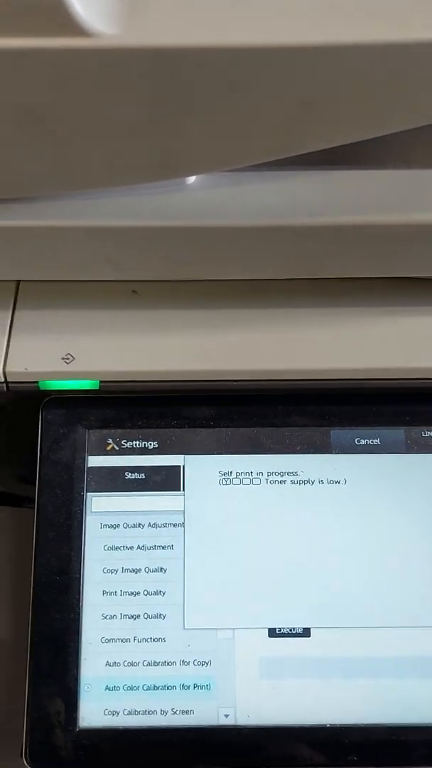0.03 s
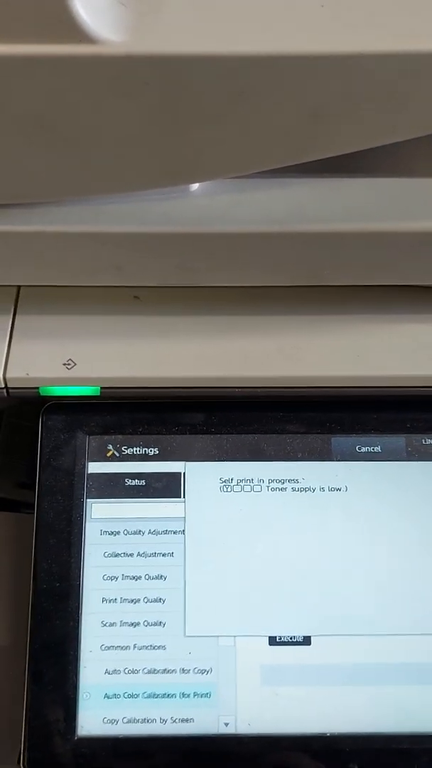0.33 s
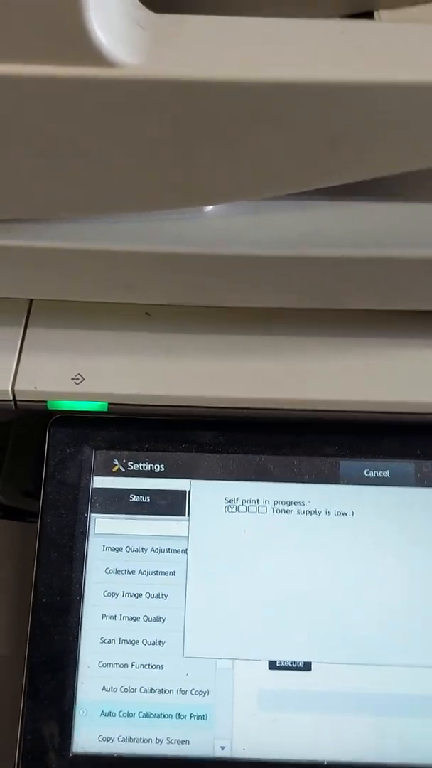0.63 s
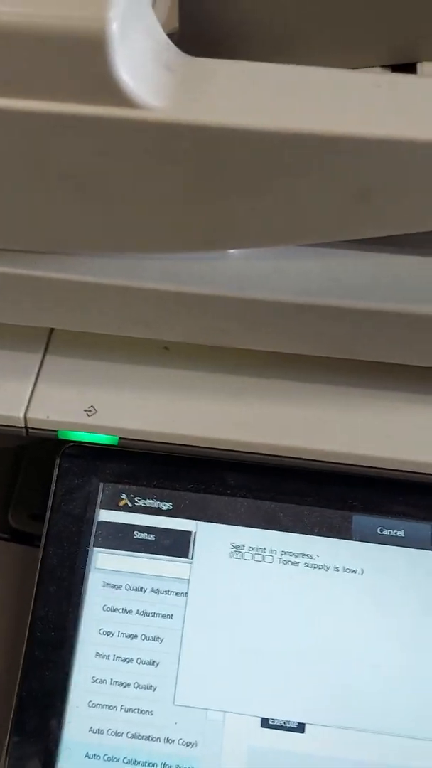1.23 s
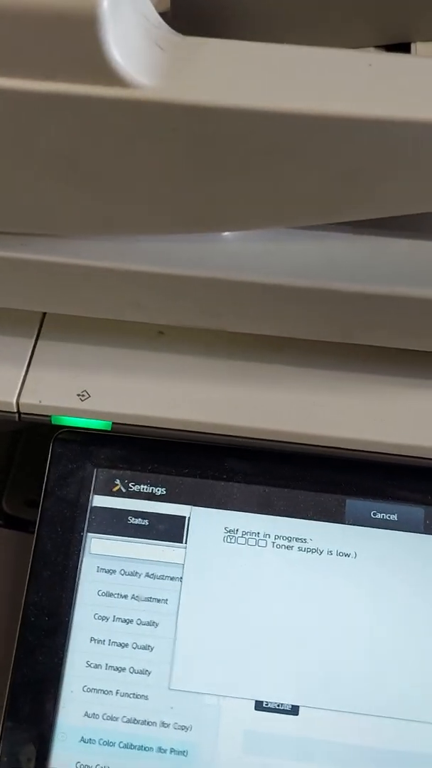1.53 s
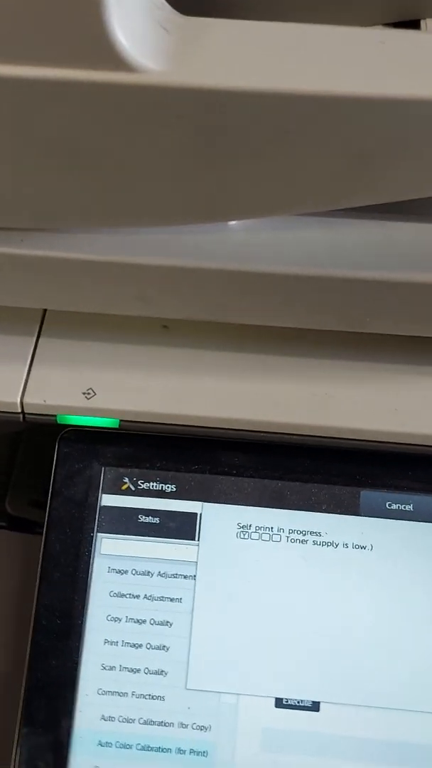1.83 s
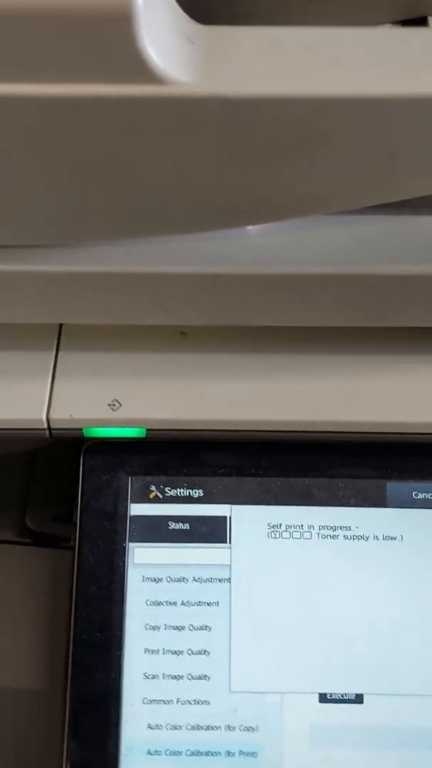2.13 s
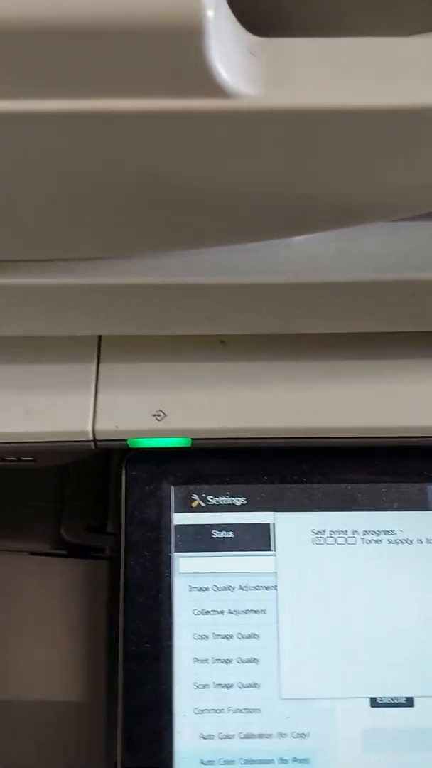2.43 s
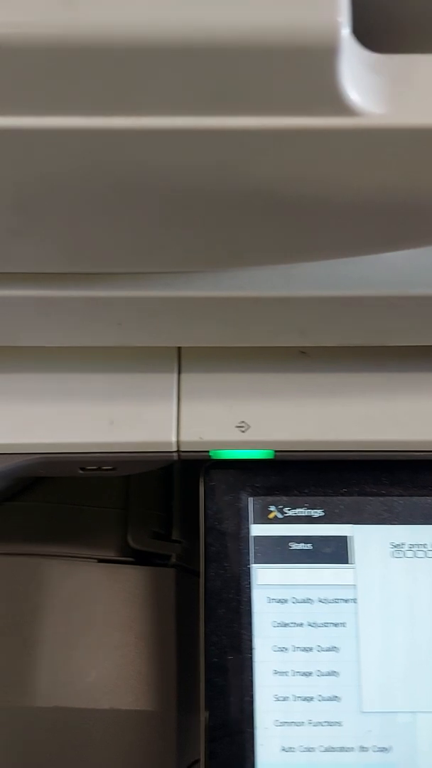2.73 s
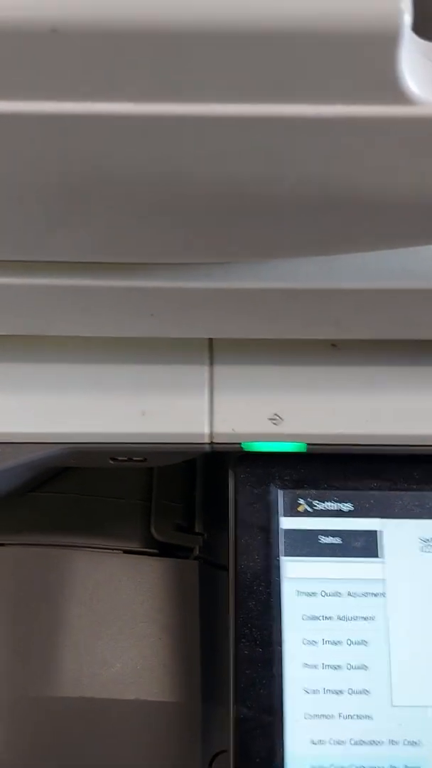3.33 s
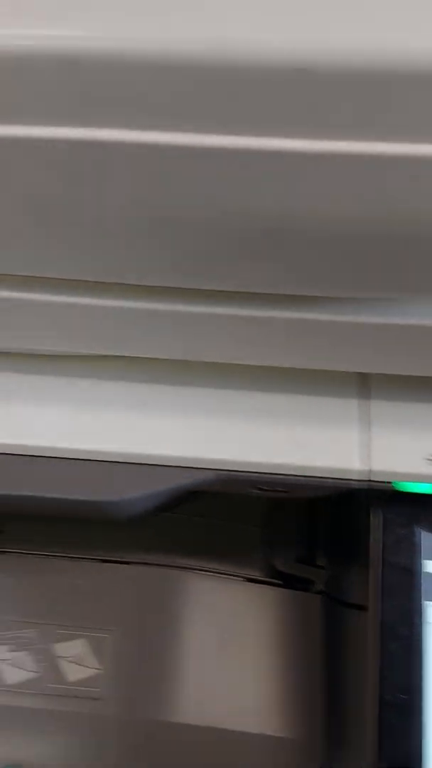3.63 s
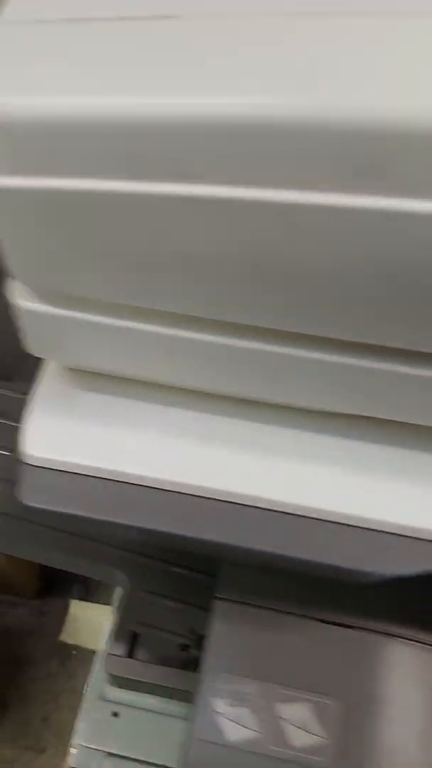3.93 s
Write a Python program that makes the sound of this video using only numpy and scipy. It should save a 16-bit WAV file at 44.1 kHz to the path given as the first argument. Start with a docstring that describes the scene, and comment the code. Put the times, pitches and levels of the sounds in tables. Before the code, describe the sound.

Office printer running with a steady hum, then whirring rollers, clicks and one loud clack.

```python
"""First you hear the fans and motors of an office printer hum and whine, from just above its panel.
Gears churn, and a part shifts inside with a dull rumble. Then a clutch clicks in, and rollers whir
and rub a sheet of paper along. A lever chatters and snaps home with one loud clack, while a loose
panel booms at each jolt. The clicks and clacks echo briefly in a small room."""
import sys
import numpy as np
from scipy import signal
from scipy.fft import rfft, irfft, next_fast_len
from scipy.io import wavfile
from scipy.ndimage import map_coordinates

SR = 44100
rng = np.random.default_rng(int(sys.argv[2]) if len(sys.argv) > 2 else 0)


def waveform_to_disk(signal):
    """Save audio, clipped to [-1, 1], as 16-bit WAV at the path in sys.argv[1]."""
    frames = np.transpose(np.atleast_2d(signal))
    scaled = np.clip(frames, -1, 1) * 32767
    samples = np.round(scaled).astype(np.int16)
    wavfile.write(sys.argv[1], SR, samples)


N = 176400  # 4 seconds

# A "colour" says how strong each pitch of a noise is next to the others; it does not set loudness.
# A "balance" is left minus right. "Likeness" is 1 when both ears hear the same noise, 0 when unrelated.
# Colour of the fans' rush: f/Hz, level/dB
FAN_COLOUR = [(25, -44), (36, -27), (50, -14), (65, -9), (85, -8.5), (125, -3.5), (165, -6), (205, -6.5),
              (245, -5), (330, -3.5), (460, -7.5), (680, -9.5), (830, -14.5), (1000, -19.5), (1220, -14.5),
              (1400, -21.5), (1800, -23.5)]
# Loudness of that rush: t/s, level/dB
FAN_LEVEL = [(0.0, -42.5), (0.33, -42), (0.91, -42), (1.24, -40.5), (2.99, -41), (3.16, -38.5), (3.69, -38),
             (4.0, -40.5)]
# Colour of the hiss from the vents: f/Hz, level/dB
VENT_COLOUR = [(600, -25), (1500, 4.5), (1850, 5.5), (2450, 6), (3000, 0), (3600, -1), (4250, 0),
               (4700, -8), (5500, -6), (6400, -2), (7400, -9.5), (8300, -11), (9200, -3.5), (10300, -8),
               (12000, -5), (13200, -10.5), (14300, -12), (15000, -21), (15800, -17)]
# Loudness of that hiss: t/s, level/dB
VENT_LEVEL = [(0, -58.5), (.35, -57), (.8, -59.5), (1.3, -58), (1.6, -58.5), (2.25, -58), (2.6, -57.5),
              (3, -57.5), (4, -58)]
# How alike most of the printer's noises are in the two ears: f/Hz, likeness
PRINTER_LIKENESS = [(60, 0.94), (130, 1), (290, 0.82), (640, 0.63), (1300, 0.015), (3100, 0.13),
                    (7000, 0.031)]
# Which side the fans, vents, rubs and slowing rollers lean to: f/Hz, balance/dB
HOUSING_BALANCE = [(60, 8), (110, -1.5), (200, 3.5), (380, -2), (700, -3.0), (1290, 0.5), (2380, -1.5),
                   (4400, -3.5), (8120, -4.5), (15000, 2.5)]

# Motor tones that never stop: f/Hz, level/dB, waver/dB, phase between the ears/rad
HUMS = [(59.7, -60, 2, 0), (135.5, -54.5, 3, 0), (176, -58, 3, 0)]
# Motor tones that come and go: f/Hz, start/s, end/s, fade/s, level/dB, balance/dB,
# phase between the ears/rad
WHINES = [(110.5, .12, .4, .1, -50.5, 1, 0), (1254, -.3, 2.7, .4, -65, 0, 1.5),
          (1319, 1.2, 2.8, .4, -68, 0, 1.5), (424.5, 1.25, 2.5, .2, -52, -1, .4),
          (348, 2.45, 3.2, .1, -50.5, -1, .4), (346, 3.19, 3.39, .04, -44, -1, .4),
          (3350, 2.41, 2.58, .02, -70, -2, 1), (1497, -.3, .5, .2, -72, 0, 1.5),
          (2519, -.3, .5, .2, -75, 0, 1.5), (4253, -.3, .5, .2, -75.5, -2, 1.5),
          (4344, -.3, .5, .2, -79, -2, 1.5), (2401, 1.2, 2.2, .3, -77, 0, 1.5),
          (2196, 3.15, 3.6, .1, -65, -3, 1), (14275, 3.1, 3.88, .05, -73, -2, 1),
          (14275, 3.87, 3.99, .03, -60.5, -2, 1)]
# Loudness of the stepper, a motor that turns in tiny steps: t/s, level/dB
STEPPER_LEVEL = [(0, -54), (.35, -52), (.5, -55), (1.05, -51), (1.55, -47.5), (1.8, -49.5), (2.15, -51),
                 (2.35, -60), (3, -64), (4, -64)]
# Loudness of the main drive, which works harder once the paper feeds: t/s, level/dB
DRIVE_LEVEL = [(0, -53), (.6, -52), (.85, -58), (1.15, -53), (1.7, -51), (2, -48), (2.25, -52), (2.55, -49),
               (2.78, -53), (3, -46), (3.3, -51), (3.55, -48.5), (3.75, -53), (3.92, -47.5), (4, -52)]
# Colour of the gear knocks: f/Hz, level/dB
GEAR_COLOUR = [(100, -17), (230, -13), (340, 4.5), (480, -7), (700, -7), (1000, -19), (2500, -19.5),
               (6000, -40), (12000, -65)]

# Soft rubs inside the housing: t/s, half length/s, level/dB
RUBS = [(0.435, 0.04, -59), (.54, 0.047, -56.5), (1.16, .06, -58.5), (1.3, 0.045, -63), (1.833, 0.046, -65),
        (2.49, 0.011, -56)]
# Colour of a rub: f/Hz, level/dB
RUB_COLOUR = [(800, -16), (2000, 0), (4000, 5.5), (7500, -2), (10000, 3.5), (13000, 2), (15800, -9)]
# Dull thuds of a shifting part: t/s, level/dB, fade time/s (every fade time is for a 60 dB drop)
THUDS = [(1.096, -31.5, .2), (1.129, -33.5, .12), (1.147, -33, .3), (1.176, -36, .3), (2.015, -38, .15),
         (2.365, -36, .22), (3.09, -33.5, .2), (3.2, -37, .25), (3.69, -34, .15)]
# Colour of a thud: f/Hz, level/dB
THUD_COLOUR = [(50, -46), (100, -11), (150, 6), (280, 0.5), (400, -7), (620, -3.5), (900, -15.5),
               (2200, -26.5), (4000, -33.5), (7000, -43.5)]

# Colour of the rollers that run down at the start: f/Hz, level/dB
RUN_DOWN_COLOUR = [(1200, -6), (2800, 2), (3500, -6), (4300, 2), (5000, -2.5), (6800, -8), (7600, -20),
                   (12000, -33)]
# Colour of the rollers that feed the sheet: f/Hz, level/dB
ROLLER_COLOUR = [(120, -44), (200, -17), (334, -2), (472, -26), (577, -4.5), (999, -11.5), (1220, -6),
                 (1700, -19.5), (2230, -16), (2680, -19.5), (3220, -16.5), (4560, -23.5), (6810, -29.5),
                 (12200, -28), (15800, -45)]
# Loudness of those feed rollers: t/s, level/dB
ROLLER_LEVEL = [(0, -78), (2.85, -79), (2.98, -50.5), (3.08, -48.5), (3.22, -42.5), (3.37, -47),
                (3.5, -47.5), (3.6, -40.5), (3.8, -41), (4, -47.5)]
# Colour of the sliding paper: f/Hz, level/dB
SHEET_COLOUR = [(1000, -32), (2500, 2.5), (4000, -2), (5500, -4.5), (9000, -2.5), (12500, -0.5),
                (15800, -3)]
# Loudness of the sliding paper: t/s, level/dB
SHEET_LEVEL = [(0, -90), (3.05, -74), (3.15, -56), (3.3, -56), (3.37, -49), (3.6, -49), (3.8, -46),
               (3.9, -49.5), (4, -46.5)]
# Which side the feed rollers and paper lean to: f/Hz, balance/dB
FEED_BALANCE = [(60, 2.0), (110, 2), (200, -17), (380, 5), (700, -11.5), (1290, 2.5), (2380, -6),
                (4400, -6.5), (8120, -3), (15000, -4)]

# Tiny bright ticks: t/s, level/dB
TICKS = [(2.7229, -45), (2.7335, -36)]
# Colour of the crack in a tick: f/Hz, level/dB
TICK_COLOUR = [(4000, -32), (7500, -8), (10700, 0), (15800, -16)]
# Jolts that make the loose panel boom: t/s, level/dB
PANEL_JOLTS = [(3.455, -38), (3.546, -30), (3.693, -31.5), (3.79, -37)]
# Small hits of the clutch and paper guides: t/s, click level/dB, knock level/dB, click's treble limit/Hz
CLUTCH_HITS = [(0.539, -64, -38, 12000), (1.229, -45, -55, 2300), (3.078, -34.5, -37, 15000),
               (3.082, -33.5, -51, 14000), (3.0877, -33, -30.5, 4500), (3.092, -28, -33.5, 6040),
               (3.174, -41, -28.5, 6000), (3.188, -34, -41, 5500), (3.2018, -39.5, -51, 15000),
               (3.246, -35.5, -48, 4500), (3.337, -36, -55, 4500), (3.41, -34, -55, 4500),
               (3.56, -42, -34, 4000), (3.578, -42, -27, 4000), (3.592, -30.5, -36, 9000),
               (3.636, -27.5, -47, 4500), (3.642, -26.5, -36, 5500), (3.654, -28.5, -49, 7500),
               (3.671, -27, -31, 8000), (3.675, -31.5, -34, 7840), (3.683, -30, -44, 6000),
               (3.8037, -51, -40, 4000), (3.921, -31, -26, 5460), (3.9845, -38, -45, 6000)]
# Colour of a click before its treble is softened: f/Hz, level/dB
CLICK_COLOUR = [(300, -33), (1000, -16), (1700, -10), (2400, 6), (3300, 2.5), (4300, 2), (5300, -3),
                (7000, -5), (8000, -1.5), (9800, -1.5), (12700, -3.5), (15800, -21)]
# Colour of a knock on the casing: f/Hz, level/dB
KNOCK_COLOUR = [(100, -35), (300, -14), (560, 6.5), (820, 0), (1100, 5.5), (1600, -9), (3000, -18),
                (8000, -28)]

# The lever's hits as it snaps home and bounces: t/s, level/dB
LEVER_HITS = [(3.6903, -24), (3.6914, -9), (3.6975, -25), (3.709, -25), (3.712, -25.5), (3.729, -29),
              (3.7345, -29), (3.751, -37), (3.759, -38)]
# The tones the lever rings with: f/Hz, relative level/dB, fade time/s
LEVER_TONES = [(1070, -11.5, .045), (1195, -23, .14), (2350, -16.5, .05), (2540, -19, .1),
               (2665, -16.5, .16), (2977, -27, .16), (3300, -24, .16), (3644, -30, .2), (4447, -31, .15),
               (5750, -22, .07), (6450, -10.5, .045), (6740, -26, .13), (7500, -20, .06),
               (7950, -16.5, .04), (8220, -18, .04), (9020, -21, .04), (12550, -22, .04)]
# Colour of the lever's crack: f/Hz, level/dB
LEVER_COLOUR = [(150, -26), (300, -8), (560, 3), (820, 2.5), (1100, 6.5), (1700, -5.5), (2400, 4),
                (3300, 0.5), (4300, 3), (5300, -3), (7000, -0.5), (8000, 6), (9800, -9), (12700, 4),
                (14000, -2.5), (15800, -16)]
# Which side the lever's crack and ring lean to: f/Hz, balance/dB
LEVER_BALANCE = [(200, -9), (600, -2), (1100, -1), (1700, 3), (2600, -10), (4300, -4), (6400, -22),
                 (7900, 3), (9200, -22), (10500, 18), (12500, -6), (15000, -8)]
# How alike the lever's crack is in the two ears: f/Hz, likeness
LEVER_LIKENESS = [(200, 1), (1100, 0.81), (2500, 0.15), (8000, 0.051)]
# How long the room's echo lasts at each pitch: f/Hz, fade time/s
ROOM_FADE = [(200, 0.2), (1000, 0.19), (3000, 0.21), (8000, 0.088), (15000, 0.1)]

WANDER_HZ, WHINE_WAVER_DB = 1.3, 1.3
STEPPER_HZ, DRIVE_HZ, THROB_PER_S, THROB_DB = 1196, 312.5, 13, 2.6
GEAR_KNOCKS_PER_S, GEAR_DB = 9, -46.5
RUN_DOWN_DB, RUN_DOWN_DB_PER_S = -59.5, 12
TICK_HZ, PANEL_HZ = 10700, 565
HIT_RISE_S, LEVER_RISE_S = .0005, .0003
RING_DB, RATTLE_RAD, RATTLE_PER_S = -2.5, .7, 300
ROOM_DB, ROOM_DELAY_S = -9, .005
FAN_TOP_HZ, TOP_HZ = 1690, 15850


def amp(db):
    """Turn decibels into a number to multiply a sound by."""
    return 10 ** (np.asarray(db) / 20)


def unit(x):
    """Scale a sound so that its average strength (rms) is 1."""
    return x / np.sqrt(np.mean(x ** 2) + 1e-20)


def at_pitch(table, hz):
    """Read a table of (f/Hz, value) rows at any pitch, on a log scale."""
    pitches, values = np.transpose(table)
    return np.interp(np.log(hz + 1), np.log(pitches + 1), values)


def clock():
    """The time of each sample, in seconds."""
    return np.arange(N) / SR


def curve(table):
    """Join (t/s, value) rows with straight lines, one value per sample."""
    return np.interp(clock(), *np.transpose(table))


def wobble(per_s):
    """A smooth curve through per_s random values each second."""
    return map_coordinates(rng.standard_normal(1000), [clock() * per_s + 2], mode="wrap")


def pan(db):
    """Left and right gains: positive dB leans left, negative leans right."""
    return amp(np.array([[.5], [-.5]]) * db)


def filtered(x, response):
    """Turn each pitch in x up or down by the gain response(hz)."""
    size = next_fast_len(N + SR // 2)
    return irfft(rfft(x, size) * response(np.fft.rfftfreq(size, 1 / SR)), size)[..., :N]


def noise(colour, balance=((100, 0),), likeness=PRINTER_LIKENESS):
    """Stereo noise of strength 1, alike in both ears in the bass and nearly unrelated in the treble."""
    def share(hz):
        angle = np.arccos(np.clip(at_pitch(likeness, hz), -1, 1)) / 2
        return amp(at_pitch(colour, hz)) * [np.cos(angle), np.sin(angle)]

    middle, side = filtered(rng.standard_normal((2, N)), share)
    ears = np.array([middle + side, middle - side])
    return unit(filtered(ears, lambda hz: pan(at_pitch(balance, hz))))


def fall(t, fade_s):
    """A fade that drops 60 dB every fade_s seconds."""
    return np.exp(-np.log(1000) * t / fade_s)


def struck(start, fade_s, rise_s=HIT_RISE_S):
    """The loudness of a hit: a quick rise, then a fade."""
    age = np.maximum(clock() - start, 0)
    return fall(age, fade_s) * (1 - np.exp(-age / rise_s))


def swell(peak_s, half_s):
    """A gentle rise and fall in loudness around peak_s."""
    return np.exp(-.5 * ((clock() - peak_s) / half_s) ** 2)


def tone(hz, lead_rad):
    """A pure tone whose pitch wanders a little; the left ear is ahead by lead_rad."""
    phase = 2 * np.pi * np.cumsum(hz + WANDER_HZ * wobble(6)) / SR
    return np.sqrt(2) * np.sin(phase + np.array([[.5], [-.5]]) * lead_rad)


def room_echo(x):
    """The walls of a small room send back a short echo whose treble dies first."""
    hz, t, spectrum = signal.stft(rng.standard_normal((2, SR // 2)), SR, nperseg=256)
    fading = spectrum * fall(t, at_pitch(ROOM_FADE, hz)[:, None])
    tail = signal.istft(fading, SR, nperseg=256)[1]
    delayed = np.pad(x.mean(axis=0), (int(ROOM_DELAY_S * SR), 0))
    return signal.fftconvolve(delayed[None], tail / np.linalg.norm(tail[0]), axes=1)[:, :N]


def fans():
    """The fans make a low rush through the casing, and air hisses from the vents."""
    rush = filtered(noise(FAN_COLOUR, HOUSING_BALANCE), lambda hz: 1 / (1 + (hz / FAN_TOP_HZ) ** 10))
    rush *= amp(curve(FAN_LEVEL) - .27 + .62 * wobble(34.89))
    hiss = noise(VENT_COLOUR, HOUSING_BALANCE) * amp(curve(VENT_LEVEL) + .5 * wobble(25.88))
    return rush + hiss


def motors():
    """Motors hum, the stepper whines, the main drive throbs, and other motors start and stop."""
    hum = sum(amp(db + waver * wobble(8.3)) * tone(hz, lead) for hz, db, waver, lead in HUMS)
    stepper = amp(curve(STEPPER_LEVEL) + WHINE_WAVER_DB * wobble(9.96)) * tone(STEPPER_HZ, lead_rad=2.09)
    drive = amp(curve(DRIVE_LEVEL) + THROB_DB * wobble(THROB_PER_S)) * tone(DRIVE_HZ, lead_rad=0)
    whines = np.zeros((2, N))
    for hz, start, end, fade, db, balance, lead in WHINES:
        running = np.clip(np.minimum(clock() - start, end - clock()) / fade + .5, 0, 1)
        whines += running * amp(db + WHINE_WAVER_DB * wobble(9.83)) * pan(balance) * tone(hz, lead)
    return hum + stepper + drive + whines


def gears():
    """The gears churn with small knocks of uneven spacing and strength."""
    gaps, sizes = .5 + rng.random((100, 2)).T
    times = np.cumsum(gaps) / GEAR_KNOCKS_PER_S
    knocks = sum(size * struck(start, fade_s=.12) for start, size in zip(times, sizes) if start < N / SR)
    return noise(GEAR_COLOUR) * amp(GEAR_DB) * knocks


def rubs():
    """Parts rub softly inside the housing, each time with a short swell of hiss."""
    loudness = sum(amp(db) * swell(peak_s, half_s) for peak_s, half_s, db in RUBS)
    return noise(RUB_COLOUR, HOUSING_BALANCE) * loudness


def thuds():
    """Parts shift deep inside and shake the casing."""
    loudness = sum(amp(db) * struck(start, fade_s, rise_s=.0021) for start, db, fade_s in THUDS)
    return noise(THUD_COLOUR) * loudness


def paper_feed():
    """One set of rollers runs down; later the next whirs with a fine rattle while the sheet slides."""
    run_down = noise(RUN_DOWN_COLOUR, HOUSING_BALANCE) * amp(RUN_DOWN_DB - RUN_DOWN_DB_PER_S * clock())
    rollers = noise(ROLLER_COLOUR, FEED_BALANCE) * amp(curve(ROLLER_LEVEL) + 1.5 * wobble(70))
    sheet = noise(SHEET_COLOUR, FEED_BALANCE) * amp(curve(SHEET_LEVEL) + .81 * wobble(150))
    return run_down + rollers + sheet


def ticks():
    """A quick pair of tiny ticks, each a bright ping with a softer crack."""
    ping = np.sqrt(2) * np.sin(2 * np.pi * TICK_HZ * clock())
    crack = amp(-5) * noise(TICK_COLOUR)
    return (ping + crack) * sum(amp(db) * struck(start, fade_s=.012) for start, db in TICKS)


def loose_panel():
    """A loose panel answers each jolt with a short, rough boom."""
    rattle = .45 * wobble(120)  # shaking the phase makes the tone rough
    ring = np.sqrt(2) * np.sin(2 * np.pi * PANEL_HZ * clock() + rattle)
    loudness = sum(amp(db) * struck(start, fade_s=.17, rise_s=.008) for start, db in PANEL_JOLTS)
    return pan(-5) * ring * loudness


def clutch_and_guides():
    """Each small hit of the clutch or a paper guide gives a dry click and knocks the plastic casing."""
    grit = noise(CLICK_COLOUR)
    clicks, knock_loudness = np.zeros((2, N)), np.zeros(N)
    for start, click_db, knock_db, top_hz in CLUTCH_HITS:
        click = grit * amp(click_db) * struck(start, fade_s=.035)
        soften = signal.butter(2, top_hz, fs=SR)
        span = slice(int(start * SR), int(start * SR) + SR // 8)
        clicks[:, span] += signal.lfilter(*soften, click[:, span])
        knock_loudness += amp(knock_db) * struck(start, fade_s=.05)
    return clicks * pan(-5) + noise(KNOCK_COLOUR) * knock_loudness


def lever():
    """The plastic lever snaps home and bounces; each hit is a crack with a brief rattling ring."""
    loudness = sum(amp(db) * struck(start, fade_s=.03, rise_s=LEVER_RISE_S) for start, db in LEVER_HITS)
    crack = noise(LEVER_COLOUR, LEVER_BALANCE, LEVER_LIKENESS) * loudness
    ring = np.zeros((2, N + SR))
    age = np.arange(SR // 4) / SR
    rise = 1 - np.exp(-age / LEVER_RISE_S)
    for start, hit_db in LEVER_HITS:
        first = round(start * SR)
        for hz, tone_db, fade_s in LEVER_TONES:
            phase = 2 * np.pi * (hz * age + rng.random())
            rattle = map_coordinates(rng.standard_normal(100), [age * RATTLE_PER_S], mode="wrap")
            wave = np.sin(phase + RATTLE_RAD * rattle)
            gain = amp(hit_db + RING_DB + tone_db) * pan(at_pitch(LEVER_BALANCE, hz))
            ring[:, first:first + len(age)] += gain * rise * fall(age, fade_s) * wave
    return crack + ring[:, :N]


def scene():
    """The whole printer in its room; only the sharp hits get an echo."""
    hits = clutch_and_guides() + lever() + ticks()
    machine = fans() + motors() + paper_feed() + rubs() + thuds() + loose_panel()
    echo = amp(ROOM_DB) * room_echo(hits)
    return machine + gears() + hits + echo


def record(dry):
    """Round off the loudest peaks and remove the treble above TOP_HZ."""
    rounded = dry / (1 + dry ** 6) ** (1 / 6)
    return filtered(rounded, lambda hz: hz < TOP_HZ)


dry = scene()
out = record(dry)
waveform_to_disk(out)
```